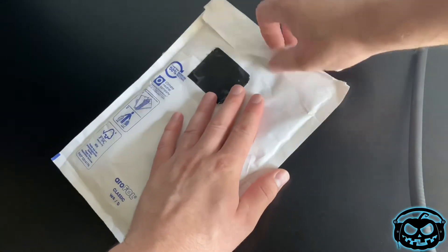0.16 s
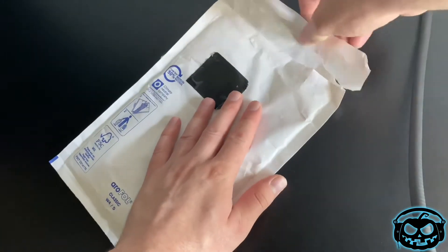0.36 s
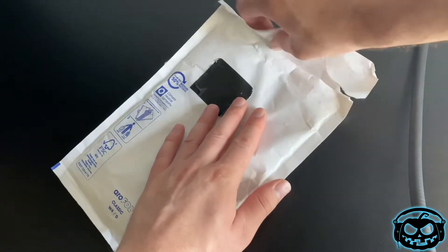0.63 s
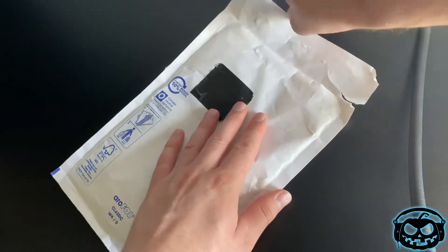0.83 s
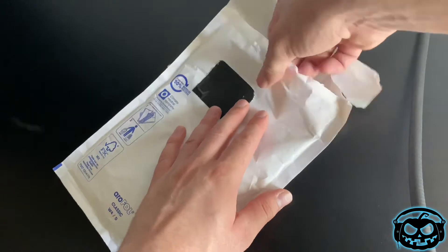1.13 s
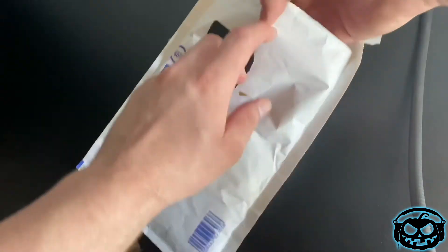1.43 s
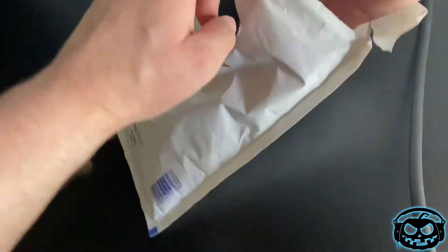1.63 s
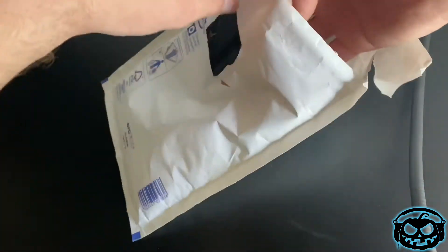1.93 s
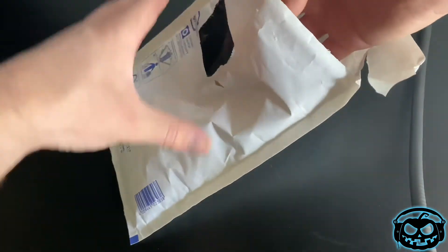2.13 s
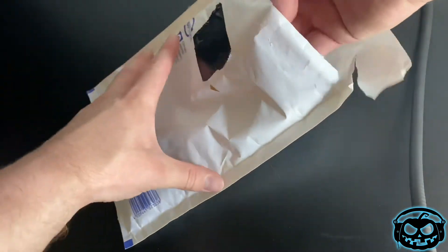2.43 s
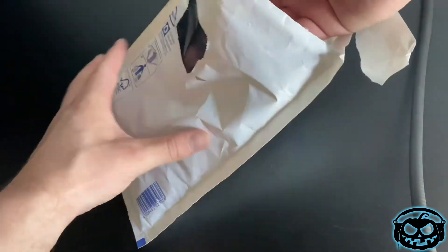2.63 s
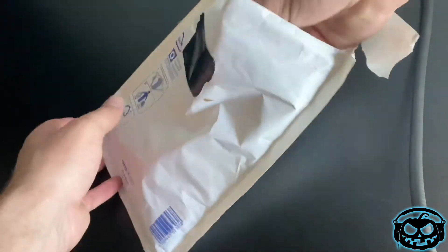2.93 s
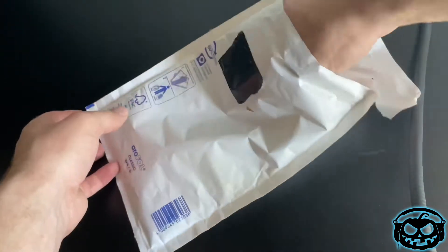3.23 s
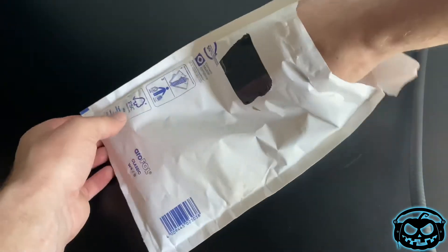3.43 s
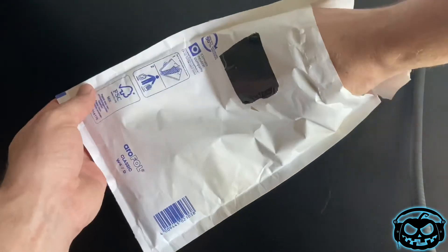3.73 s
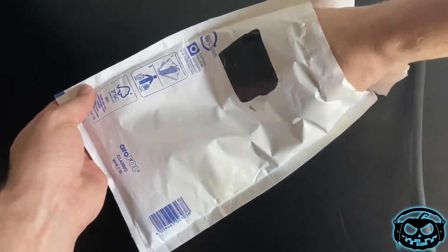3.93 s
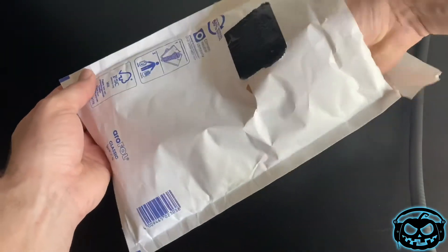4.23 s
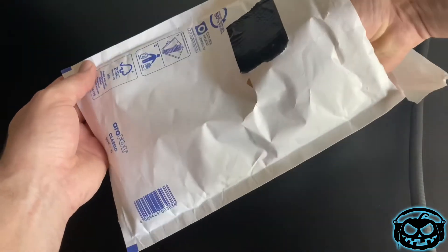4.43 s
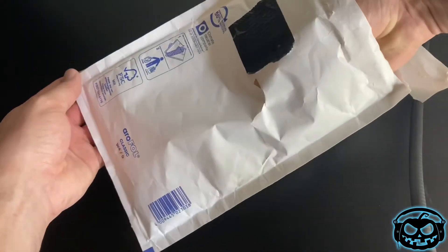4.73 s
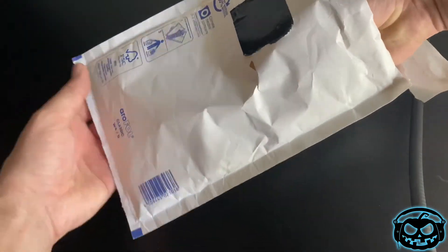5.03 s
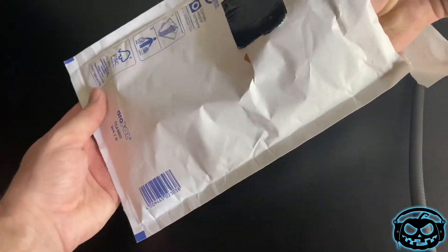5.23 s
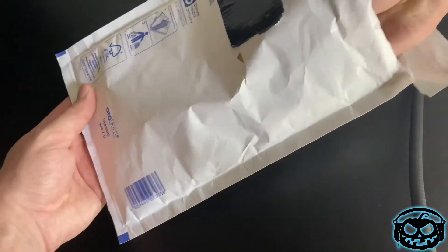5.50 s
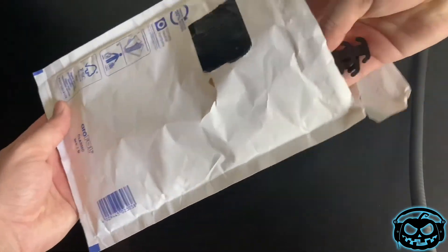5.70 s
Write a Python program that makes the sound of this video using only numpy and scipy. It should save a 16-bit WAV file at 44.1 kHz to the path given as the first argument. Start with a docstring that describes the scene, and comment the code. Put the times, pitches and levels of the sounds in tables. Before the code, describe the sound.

A padded paper envelope crackles and snaps as hands tear and rummage in it, with dry rustling, muffled bumps and papery hiss.

```python
"""Sharp snaps and short scrunches are heard first, over paper hiss, crackle, dull bumps and soft gusts.
A padded paper envelope is torn open and rummaged through on a table, close to one microphone in a small room.
Buckling creases are short noise bursts with a resonance; rubbing and crinkling are filtered noise, with tiny
pitched ticks in the first second; bumps are muffled bursts with decaying modes; skids are gliding narrow bands
of noise. Pushed air is low-frequency noise; sparse decaying echoes give the room its tail."""
import sys
import numpy as np
from scipy import signal
from scipy.fft import rfft, irfft, next_fast_len
from scipy.io import wavfile
from scipy.ndimage import uniform_filter1d

SR = 44100
rng = np.random.default_rng(int(sys.argv[2]) if len(sys.argv) > 2 else 0)


def waveform_to_disk(signal):
    """Save audio, clipped to [-1, 1], as 16-bit WAV at the path in sys.argv[1]."""
    frames = np.transpose(np.atleast_2d(signal))
    scaled = np.clip(frames, -1, 1) * 32767
    samples = np.round(scaled).astype(np.int16)
    wavfile.write(sys.argv[1], SR, samples)


N = 258426
TIME = np.arange(N) / SR

# Event levels and spectra are relative: each layer adds its own gain.
# Quiet room tone: f/Hz, density/(dB per Hz)
ROOM_TONE_SPECTRUM = [(30, 18.5), (100, -22), (200, 0.5), (500, 6), (1400, -12.5), (2300, -9), (5000, -21),
                      (8000, -45), (11500, -12), (16000, -36)]
# Reverberation time of the room: f/Hz, T60/s
ROOM_DECAY = [(150, 0.49), (1000, 0.28), (5000, 0.07), (14000, 0.26)]
# The envelope or an arm pushes air at the microphone: t/s, length/s, level/dB
AIR_GUSTS = [(0.023, 0.062, -44), (0.37, 0.068, -50), (1.407, 0.25, -48), (1.823, 0.39, -37.5),
             (2.386, 0.19, -42.5), (3.102, 0.13, -46), (5.201, 0.099, -43), (5.478, 0.16, -42.5)]
# Moving air: f/Hz, density/(dB per Hz)
AIR_SPECTRUM = [(1, 4), (4, 19.5), (11, 16.5), (20, 3), (30, -3), (60, -15), (120, -34.5), (400, -57),
                (2000, -100)]
# The envelope bumps on the table or the hand knocks inside it: t/s, level/dB, hardness/(dB per octave)
BUMP_EVENTS = [(0.221, -51, -2), (0.286, -47.5, 4), (.485, -47, 9), (.516, -37, 7), (0.533, -47, -2),
               (0.659, -56, 11), (0.87, -36.5, -2.5), (1.114, -44, 2), (1.39, -46, 13), (1.512, -45, 5),
               (1.762, -41, 0.5), (1.896, -59, 0), (2.256, -50, 5), (2.413, -49, 8.5), (2.467, -38.5, -4.5),
               (2.493, -45, -3), (2.522, -48.5, 10), (2.621, -49.5, 4), (2.66, -39, -4), (2.699, -41, -5),
               (2.795, -43, 0), (3.069, -43.5, 9.5), (3.165, -52, 1), (3.191, -40, 7), (3.306, -42.5, 1.5),
               (3.875, -43, 5), (4.25, -45.5, 7), (4.623, -50.5, 11), (4.909, -54.5, 17.5),
               (5.414, -52, 11), (5.566, -49, -2.5)]
# Bands of a bump: centre f/Hz, width/Hz
BUMP_RANGES = [(130, 120), (290, 200), (570, 400)]
# The muffling padding: f/Hz, density/(dB per Hz)
PADDING_SPECTRUM = [(30, -34), (70, -17.5), (110, 1), (180, -5.5), (230, -6), (600, -5), (850, -22.5),
                    (1300, -25), (4000, -51), (16000, -101)]
# Modes of the air cushion before a small random detuning: f/Hz, level/dB, T60/s
CUSHION_MODES = [(113, -5.5, 0.12), (142, -7.5, 0.11), (176.4, -3.5, 0.16), (303.3, -3.5, 0.21)]
# The paper skids on skin or table: t/s, length/s, mid-glide f/Hz, width/Hz, level/dB, glide/(octaves per s)
SKID_EVENTS = [(1.123, 0.12, 1085, 403, -61, -1.5), (2.473, .086, 300.4, 260, -55.5, 1),
               (2.623, 0.053, 8360, 1100, -46, 2), (2.621, .27, 2100, 700, -54, -0.7),
               (2.65, 0.091, 234, 90, -50, 8.5), (3.345, 0.16, 990, 400, -61, -2.5),
               (3.674, 0.034, 9160, 1100, -38.5, 1), (4.084, .017, 10240, 596, -48, -2),
               (4.403, 0.012, 8130, 700, -41.5, -6), (5.15, 0.19, 1100, 300, -62, 0),
               (5.154, .17, 4370, 2200, -52.5, -1.5), (5.156, .11, 2670, 400, -57, -.3)]
# Strokes of the hand along the paper: t/s, length/s, rise/s, hiss level/dB, fizz re hiss/dB
HAND_STROKES = [(.0, 0.1, 0.016, -47, -2), (0.153, 0.047, 0.02, -48, -3), (0.27, 0.031, 0.024, -47, 3.5),
                (0.469, 0.049, 0.018, -47, -0.5), (0.569, 0.1, 0.036, -48.5, 2),
                (0.833, 0.064, 0.021, -57, 0), (0.961, 0.13, 0.033, -43.5, -8),
                (1.097, 0.14, 0.012, -42, -10), (1.254, 0.21, 0.026, -44.5, -7.5),
                (1.494, 0.1, .02, -43.5, -9), (1.647, 0.17, 0.038, -43, -12),
                (2.006, 0.18, 0.02, -52.5, -9), (2.181, 0.27, 0.04, -47.5, -13),
                (2.456, 0.14, 0.034, -46, -4), (2.615, 0.21, 0.0089, -45.5, -16),
                (2.772, 0.21, 0.045, -41, -22), (3.036, 0.15, 0.015, -43.5, -16),
                (3.207, 0.17, .02, -48, -11), (3.342, 0.2, 0.016, -42.5, -25),
                (3.558, 0.17, 0.01, -42.5, -25), (3.822, 0.16, 0.022, -41.5, -15),
                (3.98, 0.17, 0.018, -44.5, -28), (4.196, 0.12, 0.011, -47.5, -21),
                (4.386, 0.25, 0.0072, -53.5, -16), (4.853, 0.037, 0.016, -51, -25),
                (4.944, 0.068, 0.013, -48, -20), (5.057, 0.057, 0.022, -47.5, -25),
                (5.147, 0.15, 0.051, -47, -18), (5.357, 0.21, 0.049, -46, -5.5)]
# Rubbed paper: f/Hz, density/(dB per Hz)
SLIDE_SPECTRUM = [(100, -7.5), (500, -3.5), (1400, -5.5), (2500, -3), (5500, -3), (7000, 0), (9300, -1),
                  (11000, -8.5), (13000, -15), (16000, -30)]
# Treble fizz of a stroke: f/Hz, density/(dB per Hz)
FIZZ_SPECTRUM = [(2000, -27), (6000, -10), (9500, 4.5), (12000, -3), (13500, -8), (16000, -23)]
# The sheet is bent and crinkles: t/s, length/s, level/dB
SHEET_FLEXES = [(0.02, 0.06, -57), (0.187, 0.061, -57), (0.472, 0.095, -60.5), (0.651, 0.031, -52),
                (0.857, 0.083, -61), (1.003, 0.075, -47), (1.1, 0.077, -48), (1.259, 0.073, -37.5),
                (1.391, 0.14, -42.5), (1.647, 0.14, -42), (2.27, 0.092, -41.5), (2.426, 0.11, -45),
                (2.704, 0.4, -42.5), (3.032, 0.032, -34.5), (3.219, 0.036, -34), (3.328, 0.22, -41),
                (3.572, 0.34, -43), (3.817, 0.17, -39), (3.972, 0.13, -46.5), (4.22, 0.058, -42),
                (4.44, 0.068, -53.5), (4.654, 0.019, -55), (4.9, 0.15, -51), (5.073, 0.027, -42),
                (5.152, 0.2, -65), (5.39, 0.13, -53)]
# Crinkling sheet and lining: f/Hz, density/(dB per Hz)
CRINKLE_SPECTRUM = [(60, -51), (130, 11), (300, -0.5), (550, 6), (900, 0), (1450, -4), (2400, 2),
                    (3800, -6.5), (7000, 1.5), (10000, -3), (16000, -31)]
# Runs of tearing fibres and collapsing folds: t/s, level/dB, brightness/(dB per octave), low body re level/dB
SCRUNCH_EVENTS = [(.687, -31, 2.5, -9), (0.869, -30.5, 5.5, -7), (1.033, -31.5, 3, 0.5),
                  (1.117, -26, -5.5, -0.5), (1.165, -40, -3, -1), (1.451, -31.5, 4, 6.5),
                  (1.761, -30.5, -4, -4), (2.863, -37.5, -11, 3), (3.024, -27, 1, -1), (3.137, -34, 3, -10),
                  (3.196, -29.5, -4, -14), (3.403, -30, -3, 4), (3.815, -30.5, 1, 4.5),
                  (4.249, -25.5, -2.5, -0.5), (4.421, -43, -5.5, 6.5), (5.116, -37, -6.5, 2)]
# Creases that buckle (the row at 4.7768 s is the 4.7751 s snap echoing off the table): t/s, level/dB,
# brightness/(dB per octave), low body re level/dB, ring f/Hz, flip time/s
SNAP_EVENTS = [(.047, -43, -14, -29, 8900, 0.0028), (.062, -39.5, -8, 4.5, 600, 0.0027),
               (.161, -39, -4, -5, 955, 0.0033), (.208, -41.5, 0, -16, 7300, .0015),
               (.218, -37.5, -5.5, -6, 674, 0.0023), (.344, -42.5, 7.5, -20, 8760, 0.0017),
               (0.4261, -35, -2.5, -9, 4430, 0.0012), (.551, -30, -3, -9, 695, 0.0022),
               (0.691, -28.5, 1.5, -12, 11100, 0.0027), (0.7015, -36.5, -5, -12, 9000, 0.0016),
               (.774, -53.5, -16, 8, 597, 0.0028), (0.8134, -43.5, -1, -19, 4530, 0.00054),
               (0.871, -42, 6, -10, 587, 0.0031), (0.9271, -33.5, -4.5, -23, 9700, 0.00068),
               (.9347, -41, 0, -13, 2500, 0.0011), (.98, -36, -2, -10, 1580, 0.0015),
               (1.0301, -32, -6, -1.5, 7050, 0.0028), (1.04, -41, -1, -8, 7000, .0008),
               (1.056, -33.5, -3.5, -4, 776, 0.0019), (1.126, -30.5, 4, -1.5, 940, 0.003),
               (1.1349, -39, 6, -13, 8000, .0005), (1.143, -38, 2, -6, 5000, 0.00066),
               (1.167, -33, -7.5, -7, 1010, 0.0014), (1.1765, -41, -1, -3, 3000, .0008),
               (1.2, -37, -12.5, 2, 1120, 0.001), (1.2161, -30.5, -0.5, -7.5, 950, 0.0013),
               (1.2925, -31, 0, -2, 10200, 0.00098), (1.306, -38.5, -3, 2, 3000, 0.00099),
               (1.341, -29, -3.5, -15, 4130, 0.0012), (1.358, -43, -6, 4, 2200, 0.0017),
               (1.3901, -36, 3, 4, 6520, 0.0017), (1.4321, -40.5, 6, -2, 9100, 0.00039),
               (1.445, -36, -7, 3.5, 1640, 0.0028), (1.4627, -39, 2, -3, 7000, 0.00092),
               (1.514, -43.5, -4, 6, 1790, 0.0018), (1.613, -42, -5.5, 12, 1970, 0.0016),
               (1.672, -42.5, -6, -5, 3300, 0.0017), (1.689, -35.5, -1, -5, 635, 0.0027),
               (1.7079, -29.5, 1.5, -8, 4530, 0.0023), (1.7353, -30.5, -1, -2, 6200, 0.0016),
               (1.766, -40.5, 3, 1, 1100, 0.0024), (1.7708, -31, 2, -2, 750, 0.0015),
               (1.916, -49, -3, 5.5, 597, 0.0019), (2.046, -57, 5, -15, 8040, .0006),
               (2.2015, -51, 5, -10, 8500, .0006), (2.256, -40.5, -1, 2.5, 9600, 0.0022),
               (2.291, -37, -1, -5, 2250, 0.0023), (2.322, -38.5, -8, 6.5, 2650, 0.0022),
               (2.355, -39, -5.5, 4.5, 2240, 0.00065), (2.4696, -29, -1, -8, 734, 0.0015),
               (2.505, -41, -4, 7, 1970, .002), (2.725, -35, -9, -3, 3540, 0.0023),
               (2.7888, -36, 2, -15, 4030, 0.00095), (2.8, -32.5, -2, 4, 550, 0.0023),
               (2.844, -29, 1, -10, 4600, 0.0013), (2.8581, -24, 2, -17, 1050, 0.0017),
               (2.865, -33, -5, -2.5, 650, 0.0025), (2.9061, -37.5, -2, -14, 4500, .0007),
               (2.9456, -26, 1, -5, 6440, 0.0011), (3.0016, -48, -10, 7, 8000, 0.0008),
               (3.025, -27, -4, -8, 4200, 0.0016), (3.033, -40, 7, -14, 7000, 0.0012),
               (3.0587, -32.5, 3.5, -5, 2900, 0.0011), (3.071, -34.5, -2, 3, 7000, 0.0013),
               (3.118, -40, 7, -19, 7500, 0.0013), (3.137, -26.5, -2, -12, 674, 0.0023),
               (3.1968, -30.5, -4.5, -0.5, 990, .0035), (3.3116, -45.5, -7, 4, 815, .0007),
               (3.352, -26, -4.5, -1, 900, 0.0027), (3.4, -32, 2.5, 5, 770, 0.0015),
               (3.457, -28.5, 0, 0, 2460, 0.0016), (3.493, -45, -7, 11, 2750, 0.0011),
               (3.5291, -36, -2, -2, 745, 0.00056), (3.55, -37, -7.5, -1.5, 623, 0.0017),
               (3.592, -38, -3, 6, 2600, 0.0028), (3.632, -40.5, 2, 5, 627, .0014),
               (3.751, -33, -1, -7, 2420, .0009), (3.761, -45.5, -8, 12, 2200, 0.0012),
               (3.8147, -29, -4.5, -3.5, 890, 0.0026), (3.882, -34, 1, 6, 700, .0022),
               (4.006, -39.5, -7.5, 4, 6200, 0.0023), (4.02, -36.5, -3, -5, 1100, 0.0024),
               (4.087, -37.5, 1, -4, 2100, .003), (4.122, -42, -7.5, 4, 750, 0.0018),
               (4.214, -44.5, -4, 6.5, 1730, 0.0023), (4.226, -49, 1, -2, 8000, .0007),
               (4.478, -39.5, -7.5, -3, 2600, 0.0013), (4.528, -55.5, -4, 6, 1010, .002),
               (4.5975, -47.5, -9.5, -5, 2430, 0.0011), (4.6697, -39.5, -0.5, -3, 2810, 0.0017),
               (4.7751, -25, -1.5, -14, 7960, 0.00096), (4.7768, -37, 6.5, -6, 8500, .0012),
               (4.829, -55.5, -9, 15.5, 840, 0.0023), (4.901, -50, -2, -3, 4000, 0.00063),
               (4.929, -52, -15, 7, 1130, 0.0034), (4.9555, -36, -1, -5, 7200, 0.002),
               (4.972, -37.5, -4, -2, 1890, 0.0026), (5.059, -48.5, -4, 9, 700, 0.0037),
               (5.094, -43.5, -3, 6, 2500, 0.0017), (5.1005, -30.5, 2.5, -24, 865, 0.0013),
               (5.2293, -42, -2, -4, 4300, .0007), (5.592, -46, 1, 0, 9320, 0.0015),
               (5.654, -49, -2.5, -3, 1960, 0.002), (5.7218, -55, 7, -18, 9000, 0.00062),
               (5.767, -44, -7, 7.5, 1750, 0.0023)]
# Bands of a fold (body, crack, sizzle, fizz): centre f/Hz, width/Hz
FOLD_RANGES = [(750, 1100), (2700, 3600), (7800, 5500), (12500, 3000)]
# Snapping paper: f/Hz, density/(dB per Hz)
PAPER_SPECTRUM = [(60, -15.5), (150, -11.5), (300, -6), (600, -6), (900, -5.5), (1450, -11.5), (2500, -6.5),
                  (3600, -8.5), (5500, -6), (7500, -3.5), (9500, -1.5), (12000, -5), (16000, -25)]

PIVOT_HZ = 5500  # the brightness of a fold tilts about this frequency
FIZZ_DB = -11  # added to the top band of a fold
EDGE_HZ = 16300  # upper band limit


def amp(db):
    """Decibel law: level to amplitude ratio."""
    return 10 ** (np.asarray(db) / 20)


def unit(x):
    """Normalization to a root-mean-square of one."""
    return x / np.sqrt(np.mean(x ** 2) + 1e-20)


def read(points, hz):
    """Linear interpolation of a table along a logarithmic frequency axis."""
    f, value = np.transpose(points)
    return np.interp(np.log(hz + 1), np.log(f + 1), value)


def add(mix, s, sound):
    """Superposition: a sound is summed into the mix at a time in seconds."""
    part = mix[max(round(s * SR), 0):][:len(sound)]
    part += sound[:len(part)]


def colour(x, points, size=4096):
    """Minimum-phase filtering: the given spectrum is imposed causally, so that attacks stay sharp."""
    log_gain = np.log(amp(read(points, abs(np.fft.fftfreq(size, 1 / SR)))))
    response = np.exp(signal.hilbert(log_gain).conj())
    taps = np.fft.ifft(response).real[:size // 2]
    return signal.oaconvolve(x, taps)[:len(x)]


def noise(points):
    """Spectral shaping: white noise is weighted to the given spectrum, at an rms of one."""
    size = next_fast_len(N, real=True)
    gain = amp(read(points, np.fft.rfftfreq(size, 1 / SR)))
    return unit(irfft(rfft(rng.standard_normal(size)) * gain, size)[:N])


def moves(rows, release, sag_db_per_s, rest_db):
    """Addition of powers: (start, length, rise, dB) movements build up, drift in level and stop over a rest."""
    power = np.full(N, amp(rest_db) ** 2)
    for start, length, rise, db in rows:
        t = np.maximum(TIME - start, 0)
        build_up = 1 - np.exp(-(t / rise) ** 2)
        stop = np.exp(-np.maximum(t - length, 0) / release)
        level_db = db - sag_db_per_s * np.minimum(t, length)
        power += (build_up * stop * amp(level_db)) ** 2
    return np.sqrt(power)


def burst(rise, decay, after_db, clump_db, linger=0.011):
    """Impulsive excitation: a rush of clumped fibre noise dies away over a weaker rustle; energy one."""
    t = np.arange(SR // 6) / SR
    clumps = amp(clump_db * unit(uniform_filter1d(rng.standard_normal(len(t)), size=24)))
    fade = np.exp(-t / decay) + amp(after_db) * np.exp(-t / linger)
    shape = (1 - np.exp(-(t / rise) ** 2)) * fade
    x = rng.standard_normal(len(t)) * clumps * shape
    return x / np.linalg.norm(x)


def blow(x, db, bands_db, bands):
    """Band energy: wider bands of (centre Hz, width Hz) spread a given level at a lower density."""
    hz, width = np.transpose(bands)
    density_db = np.array(bands_db) + 10 * np.log10(SR / 2 / width)
    return amp(db) * colour(x, list(zip(hz, density_db)), size=1024)


def blows(rows, bands, rise, decay, after_db, clump_db):
    """Superposition of impacts: one coloured burst for each row of a table."""
    out = np.zeros(N)
    for s, db, *bands_db in rows:
        add(out, s, blow(burst(rise, decay, after_db, clump_db), db, bands_db, bands))
    return out


def room_tone(tone_db=-61):
    """Stationary background: steady coloured noise at a low level."""
    return amp(tone_db) * noise(ROOM_TONE_SPECTRUM)


def room(x, wet_db=-8, count=3):
    """Reverberation: sparse echoes decay by frequency; a few random patterns take turns steadily."""
    t, wet = np.arange(SR // 3) / SR, np.zeros(N)
    for k in range(count):
        echoes = rng.standard_normal(len(t)) * (rng.random(len(t)) < .15) * (t > .003)
        hz, frame_s, z = signal.stft(echoes, SR, nperseg=256)
        decay = amp(-60 * frame_s / read(ROOM_DECAY, hz)[:, None])
        tail = signal.istft(z * decay, SR, nperseg=256)[1]
        share = np.sqrt(2 / count) * np.cos(np.pi * (1.286 * TIME + k / count))
        wet += signal.fftconvolve(x * share, tail / np.linalg.norm(tail))[:N]
    return x + amp(wet_db) * wet


def air(gain_db=12, rise=0.03):
    """Flow noise: soft gusts of moving air rumble on the microphone."""
    rows = [(s, length, rise, db) for s, length, db in AIR_GUSTS]
    gusts = moves(rows, release=.06, sag_db_per_s=0, rest_db=-52)
    return amp(gain_db) * gusts * noise(AIR_SPECTRUM)


def bumps(gain_db=26, thud_db=9, thud_per_hardness=-0.42):
    """Damped impact: padding muffles the knock, and a softer blow excites more of the air cushion's modes."""
    rows = [(s, db, -hardness, 0, hardness) for s, db, hardness in BUMP_EVENTS]
    knocks = blows(rows, BUMP_RANGES, rise=0.00089, decay=0.019, after_db=-30, clump_db=3.0)
    out = amp(gain_db) * colour(knocks, PADDING_SPECTRUM)
    t = TIME[:SR // 5]
    detunings = rng.uniform(0.936, 1.053, (len(BUMP_EVENTS), len(CUSHION_MODES)))
    for (s, db, hardness), detune in zip(BUMP_EVENTS, detunings):
        thud = np.zeros(len(t))
        for (hz, mode_db, t60), k in zip(CUSHION_MODES, detune):
            thud += amp(mode_db - 60 * t / t60) * np.sin(2 * np.pi * hz * k * t)
        add(out, s, amp(db + thud_db + thud_per_hardness * hardness) * thud / len(CUSHION_MODES))
    return out


def skids():
    """Stick-slip friction: a taut patch gives a narrow band of noise that swells, glides and fades."""
    out = np.zeros(N)
    for s, length, hz, width_hz, db, glide in SKID_EVENTS:
        n = int(length * SR)
        band = 1 / (1 + (2 * np.fft.fftfreq(n, 1 / SR) / width_hz) ** 2)
        flutter = np.fft.ifft((rng.standard_normal((n, 2)) @ [1, 1j]) * band)
        pitch = hz * 2 ** (glide * (TIME[:n] - length / 2))
        tone = (flutter * np.exp(2j * np.pi * np.cumsum(pitch) / SR)).real
        add(out, s, amp(db) * unit(tone) * signal.windows.tukey(n, .5))
    return out


def judder(depth_db=2.2):
    """Stick-slip modulation: paper catches and lets go many times a second, an uneven gain."""
    return unit(amp(depth_db * noise([(8, -30), (30, 0), (130, 0), (400, -25), (1500, -90)])))


def facets(x, patchy_db):
    """Time-varying resonance: smooth random gains over time and frequency make the sheet's colour wander."""
    z = signal.stft(x, nperseg=512)[2]
    patches = rng.standard_normal(z.shape)
    for _ in range(2):
        patches = uniform_filter1d(patches, size=4, axis=0)
        patches = uniform_filter1d(patches, size=7, axis=1)
    return unit(signal.istft(z * amp(patchy_db * unit(patches)), nperseg=512)[1][:N])


def crackle(per_s, spread_db, top_hz, width_octaves, decay, damping=.5):
    """Random point process: creases tick at their own pitches in the first second; high ones die fastest."""
    t, hz, out = np.arange(512) / SR, np.fft.rfftfreq(512, 1 / SR) + 1, np.zeros(N)
    # per_s is the mean rate over the whole scene; the times drawn lie between 0 and 1 s
    when, place, chance = rng.random((int(per_s * N / SR), 3)).T
    pitch_hz = 350 * (top_hz / 350) ** place[:, None]
    bell = 1 / (1 + (np.log2(hz / pitch_hz) / width_octaves) ** 2)
    grains = irfft(rfft(rng.standard_normal((len(when), len(t)))) * bell)
    ticks = grains * t * np.exp(-t / decay * (pitch_hz / top_hz) ** damping)
    sizes = amp(spread_db * np.minimum(-np.log(1 - chance), 2.8)) * np.sqrt(pitch_hz[:, 0])
    for s, size, tick in zip(when, sizes, ticks):
        add(out, s, size * unit(tick))
    return unit(out)


def sliding(gain_db=0, fizz_db=2, grit=0.35):
    """Sliding friction: skin rubs paper in a hiss, gritty at first, with fizz from the dry outer face."""
    grains = crackle(1000, spread_db=0.0, top_hz=12400, width_octaves=1.0, decay=0.00014, damping=0.24)
    rub = unit(rng.standard_normal(N) + grit * grains)
    stroke = dict(release=0.033, sag_db_per_s=22.0)
    hiss_gain = moves([row[:4] for row in HAND_STROKES], rest_db=-61.0, **stroke)
    fizz_rows = [(s, length, rise, db + dry_db) for s, length, rise, db, dry_db in HAND_STROKES]
    fizz_gain = moves(fizz_rows, rest_db=-90, **stroke)
    hiss = hiss_gain * judder() * facets(colour(rub, SLIDE_SPECTRUM), patchy_db=3.0)
    return amp(gain_db) * hiss + amp(fizz_db) * fizz_gain * noise(FIZZ_SPECTRUM)


def crinkling(gain_db=2.1, rise=0.015):
    """Crackling noise: the flexing sheet and its padding rustle unevenly, with ticks in the first second."""
    grains = crackle(300, spread_db=3.6, top_hz=6700, width_octaves=0.85, decay=0.00028, damping=.7)
    rustle = 0.45 * rng.standard_normal(N)
    rows = [(s, length, rise, db) for s, length, db in SHEET_FLEXES]
    flexing = moves(rows, release=0.026, sag_db_per_s=-1, rest_db=-66)  # each flex grows slightly
    return amp(gain_db) * flexing * unit(colour((grains + rustle) * judder(), CRINKLE_SPECTRUM))


def fold_bands(brightness, body_db):
    """Spectral tilt: brightness sets the treble bands of a fold, and the sheet adds a low body."""
    crack, sizzle, fizz = brightness * np.log2(np.array(FOLD_RANGES)[1:, 0] / PIVOT_HZ)
    return [body_db, crack, sizzle, fizz + FIZZ_DB]


def chatter(x, delay, after_db, count=4):
    """Cascaded buckling: a crease sets off a few weaker ones nearby within the next milliseconds."""
    out = x.copy()
    for wait, size in rng.exponential(1, (count, 2)):
        add(out, .002 + wait * delay, amp(after_db) * min(size, 2) * rng.choice([-1, 1]) * x)
    return out


def snaps(rise_share=0.65, ring=0.46, quality=4):
    """Snap-through buckling: a crease flips, in a dry click or a slower crunch, and rings its facet of paper."""
    out = np.zeros(N)
    for s, db, brightness, body_db, hz, flip in SNAP_EVENTS:
        bands_db = fold_bands(brightness, body_db)
        click = burst(rise_share * flip, flip, after_db=-31.5, clump_db=2.5)
        click = chatter(click, delay=.006, after_db=-19.0)
        facet = signal.lfilter(*signal.iirpeak(hz, quality, fs=SR), click)
        click = blow(click, db, bands_db, FOLD_RANGES)
        facet = blow(facet, db, bands_db, FOLD_RANGES)
        # the ring takes a share of the energy
        add(out, s, np.std(click) * unit(unit(click) + ring * unit(facet)))
    return out


def folds(snaps_db=25, scrunches_db=22):
    """Buckling and fracture: a crease snaps through within milliseconds; a run of fibres takes longer."""
    runs = [(s, db, *fold_bands(brightness, body_db)) for s, db, brightness, body_db in SCRUNCH_EVENTS]
    scrunches = blows(runs, FOLD_RANGES, rise=0.00037, decay=0.028, after_db=-21, clump_db=-1.5)
    return colour(amp(snaps_db) * snaps() + amp(scrunches_db) * scrunches, PAPER_SPECTRUM)


def scene():
    """Linear superposition: the envelope in the room, with moving air and quiet room tone."""
    paper = folds() + sliding() + crinkling() + bumps() + skids()
    return (room(paper) + air() + room_tone())[None]


def record(dry):
    """Band limitation: a linear-phase low-pass filter removes the highest treble."""
    low_pass = signal.firwin(511, EDGE_HZ, window=("kaiser", 9), fs=SR)
    return signal.oaconvolve(dry, low_pass[None], "same")


dry = scene()
out = record(dry)
waveform_to_disk(out)
```